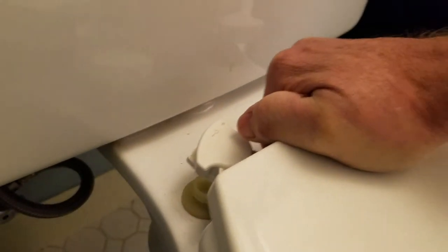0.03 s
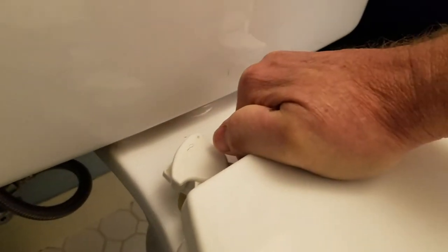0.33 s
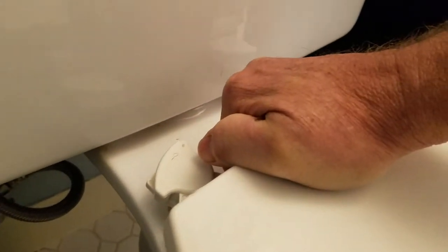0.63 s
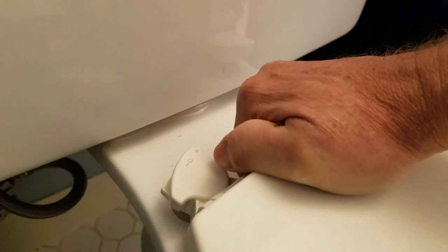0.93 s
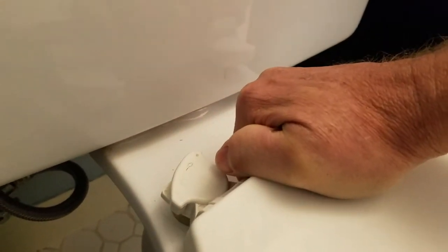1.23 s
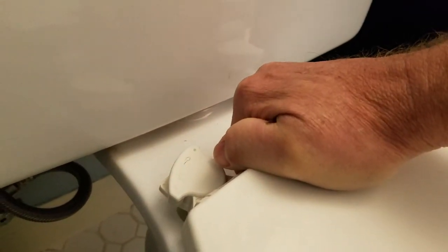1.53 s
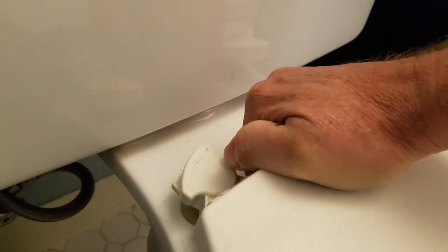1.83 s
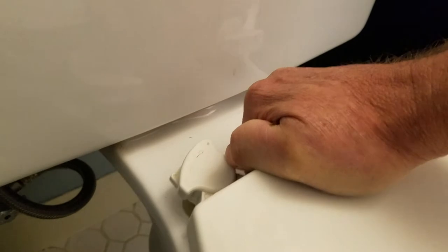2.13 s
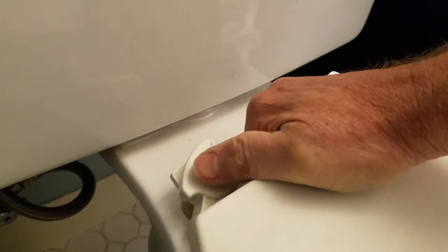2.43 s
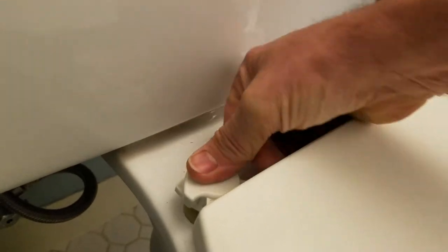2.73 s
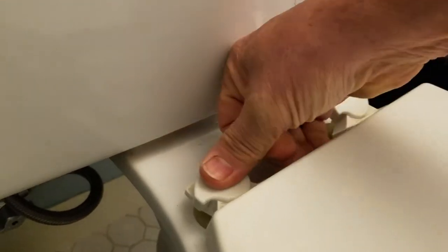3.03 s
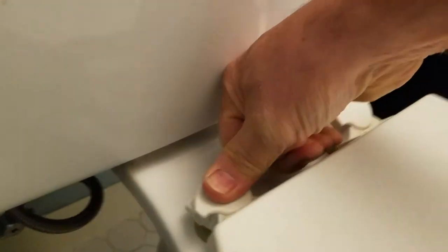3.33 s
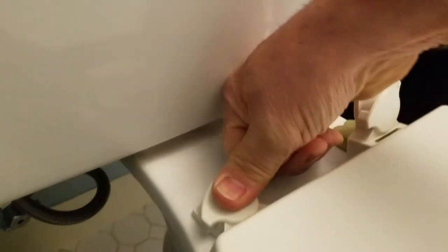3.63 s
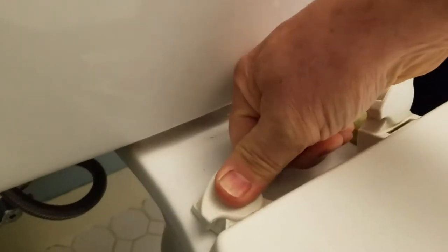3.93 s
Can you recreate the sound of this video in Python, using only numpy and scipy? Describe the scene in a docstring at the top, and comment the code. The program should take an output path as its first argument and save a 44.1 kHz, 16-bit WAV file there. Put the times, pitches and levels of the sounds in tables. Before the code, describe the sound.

A plastic toilet seat hinge clicks sharply at the start, in a small, quiet bathroom. Faint rubbing and light, hollow clicks and knocks follow until about 2.7 seconds. Dry pops sound right at the microphone, a small one near 1 second and a loud one at 2.1. From 3.3 to 3.7 seconds the hinge snaps free with bright cracks and the seat clatters loudly on the bowl, ringing briefly.

```python
"""Toilet seat and hinge

A hand works the plastic hinge of a toilet seat in a small, quiet bathroom: the parts click, knock and
rub, then the hinge snaps free and the seat clatters on the bowl. Every knock rings the same seat and
bowl in the tiled room. A few dry little pops sound right at the microphone."""
import sys
import numpy as np
from scipy import signal
from scipy.fft import rfft, irfft, next_fast_len
from scipy.io import wavfile

SR = 44100
rng = np.random.default_rng(int(sys.argv[2]) if len(sys.argv) > 2 else 0)


def dump_mix(stems):
    """Bounce the given channels to the path in sys.argv[1] as a 16-bit WAV at rate SR."""
    frames = np.atleast_2d(stems).T  # one column per channel
    limited = np.clip(frames, -1, 1)  # hard clip at full scale
    pcm = np.round(limited * 32767).astype(np.int16)
    wavfile.write(sys.argv[1], SR, pcm)


N = 176400

# crossovers between the six registers of a knock: f/Hz
CROSSOVERS = [180, 275, 410, 1100, 5000]
# hits of hinge and seat: t/s, then level/dB of bass, low body, body, middle, clack, treble
HITS = [(0.1403, -46, -46.5, -45, -45.5, -45.5, -53.5), (.147, -60, -41.5, -59, -51, -42.5, -47.5),
        (1.271, -77, -67.5, -71, -73.5, -59, -69), (1.393, -71, -59.5, -57, -47.5, -51.5, -69),
        (1.436, -60.5, -60, -58, -67, -62, -89), (1.578, -65, -61.5, -57, -59, -57.5, -89),
        (1.617, -55, -58, -59, -49, -46.5, -52), (1.873, -57.5, -47.5, -47, -49, -55.5, -71),
        (1.892, -51, -38.5, -36.5, -41, -52.5, -79.5), (1.944, -63, -89, -72, -67, -51.5, -62),
        (2.010, -39, -33.5, -46.5, -49.5, -53.5, -65.5), (2.358, -81, -71, -69.5, -69, -65.5, -71),
        (2.465, -78, -64.5, -72.5, -68.5, -58.5, -63.5), (2.564, -64, -64, -65, -69, -52, -48.5),
        (2.618, -54, -55, -59, -60.5, -59.5, -84), (2.669, -53.5, -47.5, -51.5, -50, -53.5, -66),
        (3.343, -54.5, -49.5, -39.5, -42.5, -53.5, -70), (3.391, -40.5, -28, -24, -32.5, -40, -45.5),
        (3.456, -36, -24.5, -22.5, -28.5, -24.5, -30.5), (3.463, -33.5, -28.5, -10.5, -16.5, -17.5, -37.5),
        (3.487, -24, -29.5, -13.5, -31, -36, -44.5), (3.526, -51, -41, -44.5, -31.5, -23.5, -32.5),
        (3.583, -39, -22.5, -14.5, -25.5, -29.5, -48.5), (3.609, -42, -35, -41, -28, -35, -56.5),
        (3.682, -58, -60, -36, -68.5, -76, -77)]
def knocks(ring_db_per_db=.15, ref_body_db=-34.5):
    """Where and how hard the parts meet sets how strongly each register rings in the first 30 ms."""
    out, bands = np.zeros((2, N)), register_filters()
    t, attack = np.arange(int(.55 * SR)) / SR, int(.03 * SR)
    for s, *levels_db in HITS:
        # heavier blows set more of the seat ringing
        hit = seat_ring(t, ring_db_per_db * (levels_db[2] - ref_body_db))
        attack_db = [20 * np.log10(rms(signal.sosfilt(sos, hit[:, :attack]))) for sos in bands]
        add(out, s, equalise(hit, np.subtract(levels_db, attack_db)))
    return out


# short, hollow ring of the plastic shell: f/Hz, level/dB
SHELL_MODES = [(835, -4), (1065, -5), (1260, -3), (1490, 0), (1690, -1), (1920, 1), (2385, 1), (2790, -8)]
# thump of the seat, two quickly damped tones over a low, lingering one: f/Hz, level/dB, t60/s
THUMP_MODES = [(139, 1.5, 0.33), (230, -6.5, 0.038), (315.3, 14, 0.067)]
# lasting tones of seat, bowl and room: f/Hz, level/dB, t60/s
TAIL_MODES = [(73, -4, .45), (139, 7, .34), (217, 2, .27), (249, 1, .26), (303, -3, .4), (348, 8, .27),
              (632, 9, .31), (656, 10, .31), (716, -6, .43), (848, 4, .2), (966, -3, .32), (1054, -1, .3),
              (1487, 1, .25), (1714, 6, .26), (1791, 6, .26), (1927, 8, .26), (2412, -4, .26)]
def seat_ring(t, tail_db, shell_t60_s=.13, scatter_db=3, body_db=-11.5):
    """One contact rings shell, seat, bowl and room; shell and tail tones vary from blow to blow."""
    wash = clatter(t)
    shell = tail = 0
    for hz, db in SHELL_MODES:
        detune = 1 + .003 * rng.standard_normal()  # the grip shifts the shell's pitches
        shell += mode(t, hz * detune, db + scatter_db * rng.standard_normal(), shell_t60_s)
    thump = sum(mode(t, hz, db, t60) for hz, db, t60 in THUMP_MODES)
    for k, (hz, db, t60) in enumerate(TAIL_MODES, 1):
        tail += (-1) ** k * mode(t, hz, db + scatter_db * rng.standard_normal(), t60)
    return wash + shell + amp(body_db) * (thump + amp(tail_db) * tail)


# tone colour of the clatter: f/Hz, level/dB
CLATTER_EQ = [(25, -36), (45, -13.5), (65, 1.5), (290, 0.5), (410, -1), (520, -0.5), (1100, 0), (2000, -3),
              (3200, -5), (4500, -12), (6000, -21.5), (7700, -24), (9800, -35), (16000, -29)]
# decay of the tiled room: f/Hz, t60/s
ROOM_DECAY = [(60, 0.42), (160, 0.36), (420, 0.32), (1100, 0.4), (2900, 0.3), (7700, 0.25), (15000, 0.26)]
def clatter(t, punch_db=4, punch_t60_s=.065, rise_s=.00037):
    """The dense ring of plastic and tiles: a punch up front, then a wash that dies sooner in the treble."""
    hz, s, frames = signal.stft(noise(CLATTER_EQ, len(t)), SR, nperseg=256)
    decay = amp(-60 * s / along(ROOM_DECAY, hz)[:, None])
    wash = signal.istft(frames * decay, SR, nperseg=256)[1][:, :len(t)]
    punch = 1 + amp(punch_db - 60 * t / punch_t60_s)
    return wash * punch * (1 - np.exp(-t / rise_s))


def mode(t, hz, db, t60, blur_hz=1, rise_cycles=.29):
    """One resonance in stereo: it builds within its first cycle and wavers slightly as it dies."""
    waver = np.cumsum(rng.standard_normal(len(t))) * np.sqrt(2 * np.pi * blur_hz / SR)
    gain, phase = stereo_image(hz)
    envelope = amp(db - 60 * t / t60) * (1 - np.exp(-t * hz / rise_cycles))
    return gain * np.sin(2 * np.pi * hz * t + waver + phase) * envelope


def register_filters(order=4):
    """Causal filters for the six registers of a knock."""
    middle = [(pair, "band") for pair in zip(CROSSOVERS, CROSSOVERS[1:])]
    bands = [(CROSSOVERS[0], "low"), *middle, (CROSSOVERS[-1], "high")]
    return [signal.butter(order, hz, kind, fs=SR, output="sos") for hz, kind in bands]


# softness of each crossover: half width/octaves
CROSSOVER_WIDTHS = [.18, .18, .18, .3, .8]
def equalise(x, gains_db, size=32768):
    """Causal equaliser with one gain for each register and soft steps between them."""
    corners_hz = np.array(CROSSOVERS)[:, None] * 2 ** np.outer(CROSSOVER_WIDTHS, [-1, 1])
    curve = np.column_stack([corners_hz.ravel(), np.repeat(gains_db, 2)[1:-1]])
    cepstrum = irfft(np.log(amp(along(curve, np.fft.rfftfreq(size, 1 / SR)))))
    fold = np.r_[1, np.full(size // 2 - 1, 2), np.zeros(size // 2)]  # minimum phase: no pre-ring
    response = np.exp(rfft(cepstrum * fold))
    return irfft(rfft(x, size) * response)[:, :x.shape[1]]


# bright tone colour of a crack: f/Hz, level/dB
CRACK_EQ = [(500, -8.5), (2400, 15), (5500, -2), (7700, -1), (10000, -5.5), (16000, -2)]
# sharp cracks of the hinge: t/s, level/dB
HINGE_CRACKS = [(0.1472, -26), (1.156, -52.5), (1.322, -50), (1.6192, -28.5), (3.309, -46.5), (3.3927, -29),
                (3.451, -33), (3.461, -24), (3.527, -19), (3.5844, -34.5)]
def cracks(t60_s=.0085):
    """Plastic edges slip past each other: very short, bright, dry cracks."""
    out, t = np.zeros((2, N)), np.arange(SR // 10) / SR
    for s, db in HINGE_CRACKS:
        add(out, s, noise(CRACK_EQ, len(t)) * amp(db - 60 * t / t60_s))
    return out


# tone colours of plastic scrape and skin hiss: f/Hz, level/dB
SCRAPE_EQ = [(40, -25.5), (100, -9), (330, 3.5), (500, -10), (1200, -5), (2700, -10.5), (3600, -16),
             (4650, -12), (5600, -28), (16000, -30.5)]
SKIN_EQ = [(500, -39.5), (2500, 3), (6000, -1), (9500, -1), (13000, 6.5), (16000, 4.5)]
# slides of fingers and plastic: centre t/s, half length/s, scrape level/dB, skin level/dB
SLIDES = [(.47, 0.044, -63.5, -84), (0.671, 0.049, -58.5, -82), (0.852, 0.031, -64.5, -99),
          (1.375, 0.05, -61, -96), (2.194, 0.011, -57, -83), (2.277, 0.045, -69, -66.5),
          (2.404, 0.016, -85, -58), (2.577, 0.035, -56, -57.5), (2.688, 0.04, -54, -69),
          (3.3, 0.085, -67.5, -68.5), (3.456, 0.017, -44.5, -58)]
def rubs():
    """Each slide swells and fades: a dull scrape of plastic and a hiss of skin."""
    t = np.arange(N) / SR
    scrape, skin = np.zeros(N), np.zeros(N)
    for s, half_s, scrape_db, skin_db in SLIDES:
        stroke = np.exp(-.5 * ((t - s) / half_s) ** 2)
        scrape += amp(scrape_db) * stroke
        skin += amp(skin_db) * stroke
    return scrape * noise(SCRAPE_EQ, N) + skin * noise(SKIN_EQ, N)


# dry pops: t/s, level/dB, f/Hz, t60/s, pan to the left/dB
CLOSE_POPS = [(0.731, -51, 377, 0.018, 23.5), (1.0408, -26.5, 550, 0.0041, 17.5),
              (2.1085, -8, 790, 0.0031, 8), (3.299, -34, 630, 0.0067, 16)]
def pops(rise_s=.0007, top_hz=1650):
    """Close, dull pops of a cycle or two, with no room on them."""
    out, t = np.zeros((2, N)), np.arange(SR // 20) / SR
    for s, db, hz, t60, pan_db in CLOSE_POPS:
        wave = np.sin(2 * np.pi * hz * t + np.array([[0], [np.pi / 2]]))  # right leads by a quarter cycle
        envelope = amp(db - 60 * t / t60) * (1 - np.exp(-(t / rise_s) ** 2))
        add(out, s, pan(pan_db) * wave * envelope)
    return filtered(out, lambda hz: 1 / (1 + (hz / top_hz) ** 6))


# tone colour of the background bed: f/Hz, level/dB
ROOM_TONE_EQ = [(40, -23), (62, 9.5), (100, -4), (170, -12.5), (310, -2), (1000, -7), (4200, -13),
                (6000, -21), (9500, -21.5), (13000, -16), (16000, -13)]
def room_tone(level_db=-65):
    """The quiet room and the microphone's hiss make a steady bed."""
    return amp(level_db) * noise(ROOM_TONE_EQ, N)


# stereo likeness of the room's sound: f/Hz, left-right correlation
CORRELATION = [(60, 0.52), (350, 0.9), (600, 0), (1000, 0.014), (1800, 0.19)]
def noise(eq, size):
    """Coloured noise of rms 1, as the two microphones hear it in the room."""
    def mid_side(hz):
        width = np.arccos(np.clip(along(CORRELATION, hz), -1, 1)) / 2
        return amp(along(eq, hz)) * [np.cos(width), np.sin(width)]

    def placement(hz):
        gain, phase = stereo_image(hz)
        return gain * np.exp(1j * phase)

    mid, side = filtered(rng.standard_normal((2, size)), mid_side)
    pair = filtered(np.array([mid + side, mid - side]), placement)
    return pair / rms(pair)


# stereo balance: f/Hz, pan to the left/dB
PAN_CURVE = [(60, 1), (140, 6), (220, -4), (350, -4), (600, 0), (15000, 2)]
# lead of left over right: f/Hz, phase/rad
PHASE_LEAD = [(60, -.85), (140, -.8), (220, -.35), (330, -.6), (640, -.2), (1100, -.5), (1700, 1.6),
              (3000, 2)]
def stereo_image(hz):
    """Gain and phase of a frequency at the left and right microphones."""
    return pan(along(PAN_CURVE, hz)), np.array([[.5], [-.5]]) * along(PHASE_LEAD, hz)


def pan(db):
    """Left and right gains for a level difference."""
    return amp(np.array([[.5], [-.5]]) * db)


def amp(db):
    """Decibels to gain."""
    return 10 ** (np.asarray(db) / 20)


def rms(x):
    """Root mean square."""
    return np.sqrt(np.mean(x ** 2) + 1e-20)


def along(points, hz):
    """Read a curve of (f/Hz, value) points on a log axis."""
    f, values = np.transpose(points)
    return np.interp(np.log(hz + 1), np.log(f + 1), values)


def filtered(x, response):
    """Shape x with a frequency response."""
    n = x.shape[-1]
    padded = next_fast_len(n + 4096)
    return irfft(rfft(x, padded) * response(np.fft.rfftfreq(padded, 1 / SR)), padded)[..., :n]


def add(track, s, sound):
    """Mix a sound into the track at time s."""
    i = round(s * SR)
    track[:, i:i + sound.shape[1]] += sound[:, :N - i]


def scene():
    """All the handling over the quiet of the room."""
    return knocks() + rubs() + cracks() + pops() + room_tone()


def record(dry, low_cut_hz=44, ceiling=.97, top_hz=16000):
    """Master chain: cut the deep bass, round the highest peaks and drop the very top."""
    x = signal.sosfilt(signal.butter(4, low_cut_hz, "high", fs=SR, output="sos"), dry)
    x = x / (1 + (x / ceiling) ** 10) ** (1 / 10)
    return filtered(x, lambda hz: hz < top_hz)


dry = scene()
out = record(dry)
dump_mix(out)
```